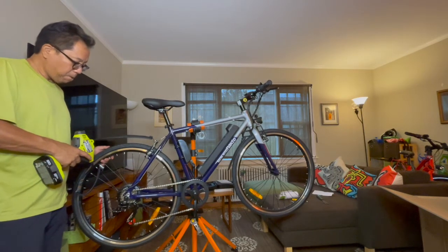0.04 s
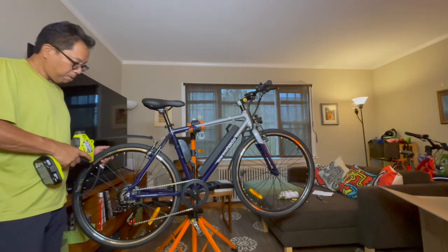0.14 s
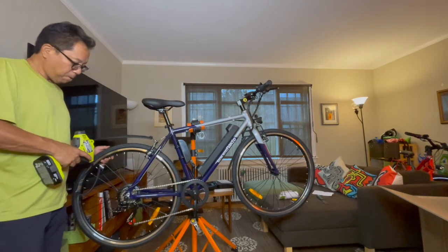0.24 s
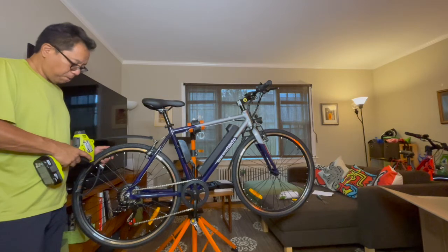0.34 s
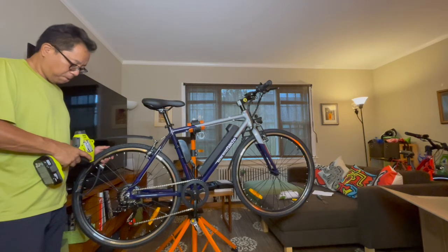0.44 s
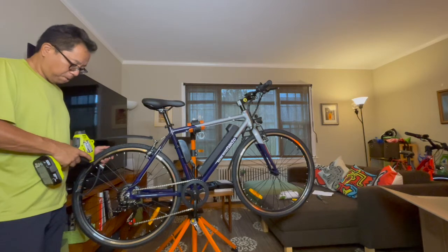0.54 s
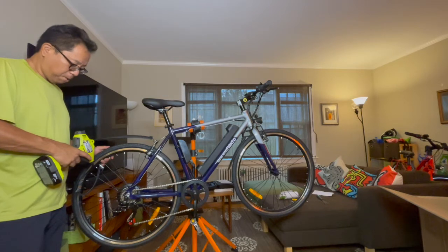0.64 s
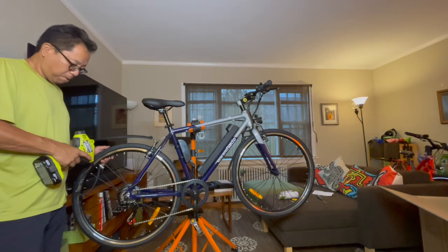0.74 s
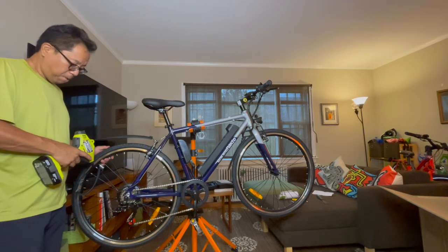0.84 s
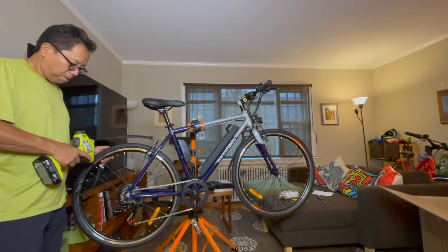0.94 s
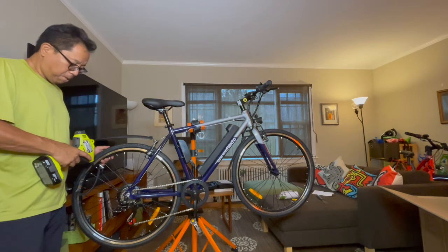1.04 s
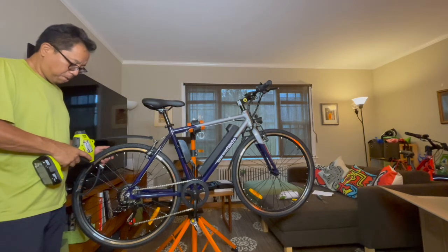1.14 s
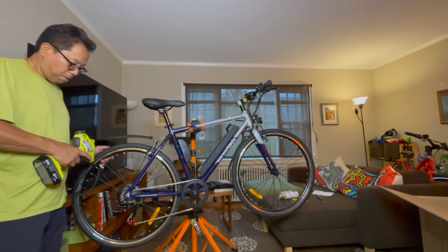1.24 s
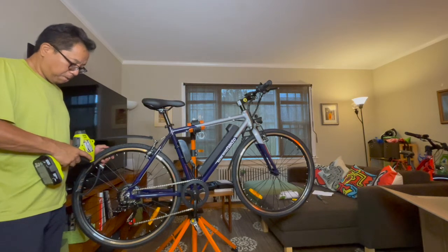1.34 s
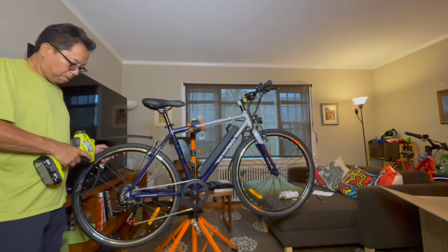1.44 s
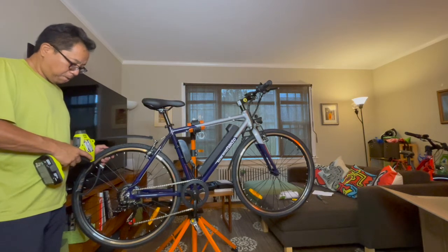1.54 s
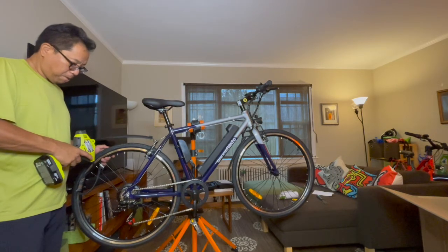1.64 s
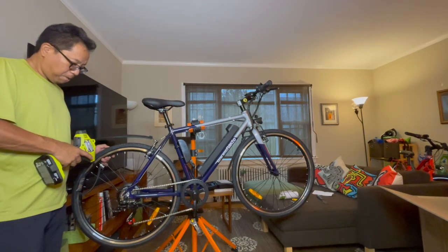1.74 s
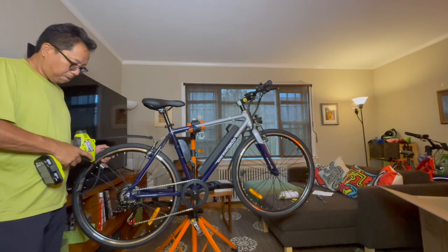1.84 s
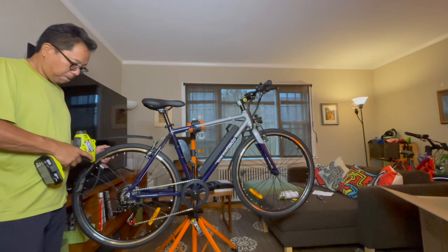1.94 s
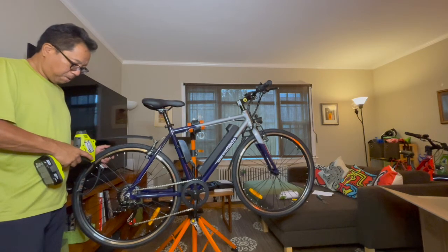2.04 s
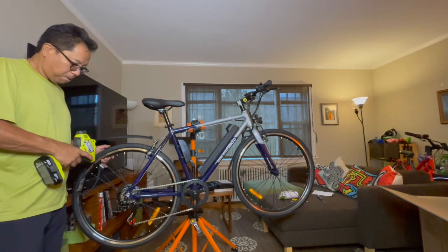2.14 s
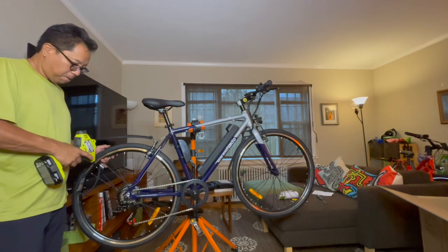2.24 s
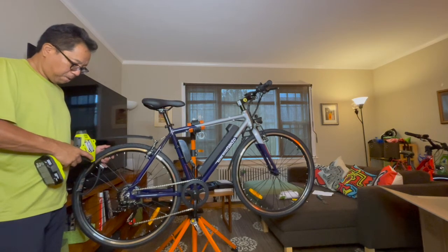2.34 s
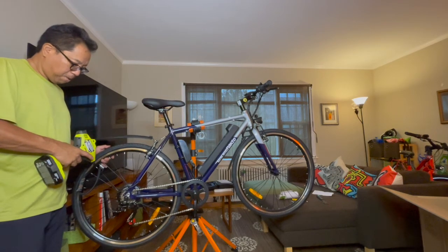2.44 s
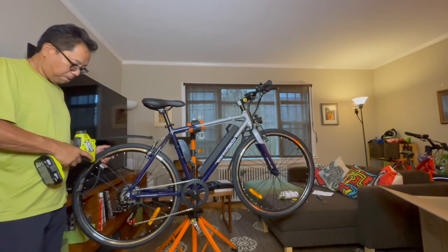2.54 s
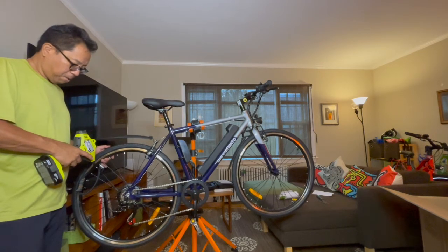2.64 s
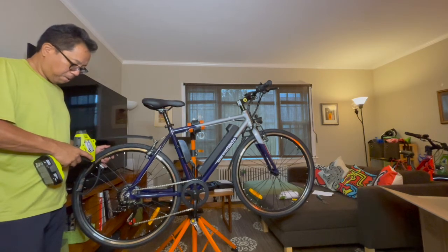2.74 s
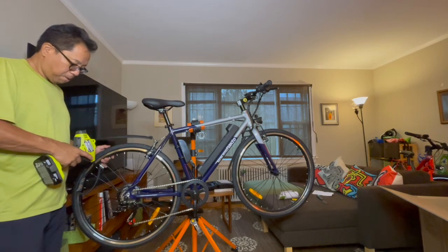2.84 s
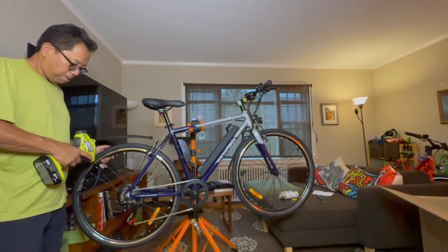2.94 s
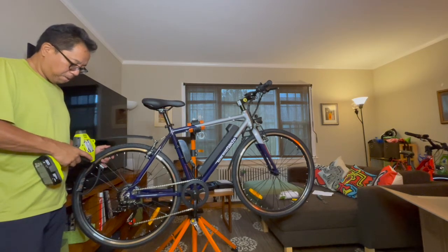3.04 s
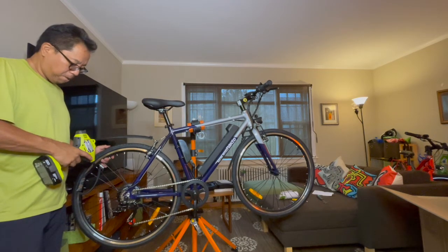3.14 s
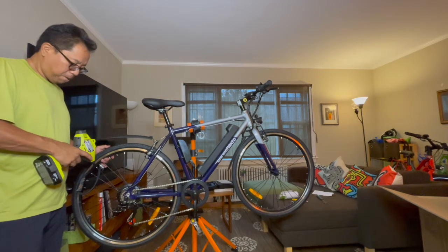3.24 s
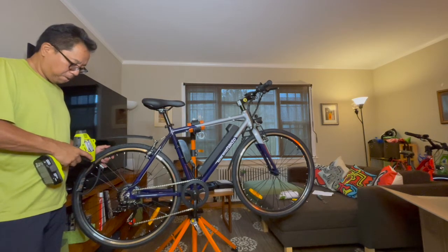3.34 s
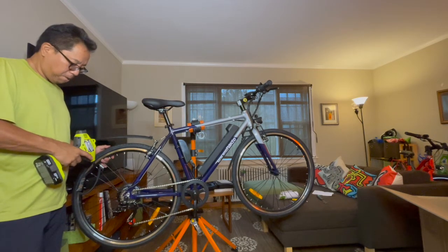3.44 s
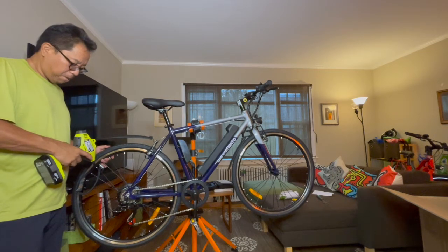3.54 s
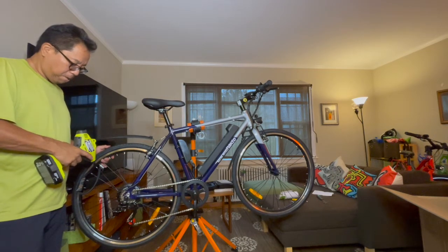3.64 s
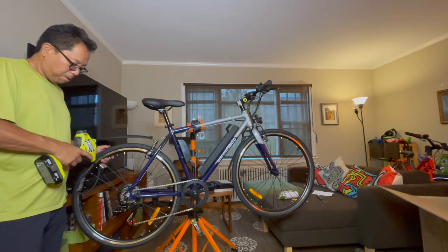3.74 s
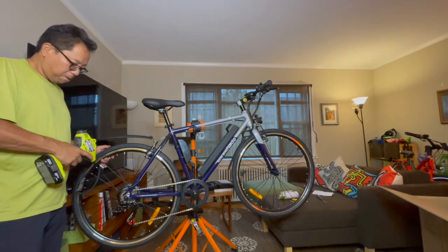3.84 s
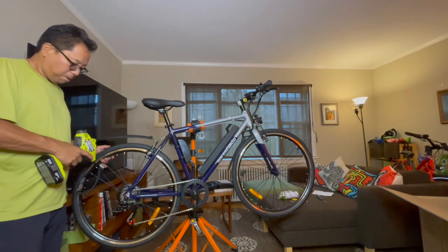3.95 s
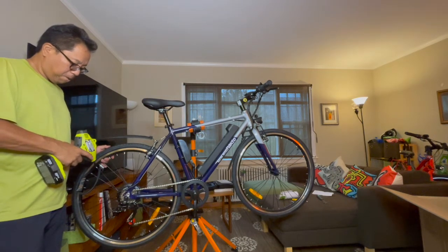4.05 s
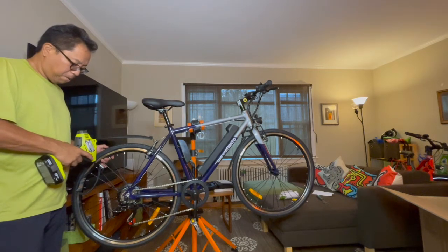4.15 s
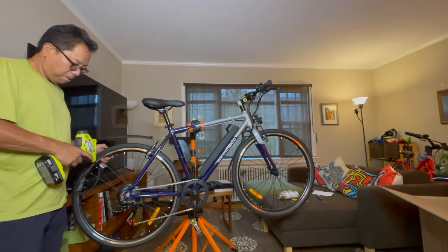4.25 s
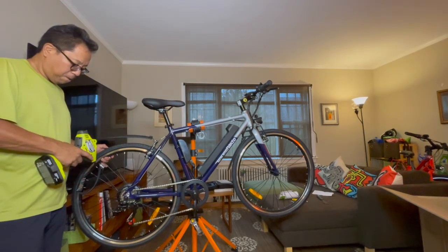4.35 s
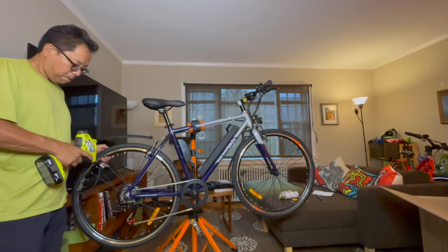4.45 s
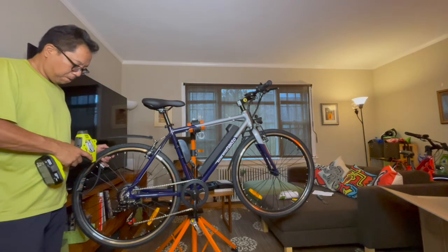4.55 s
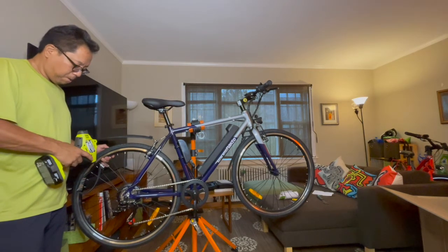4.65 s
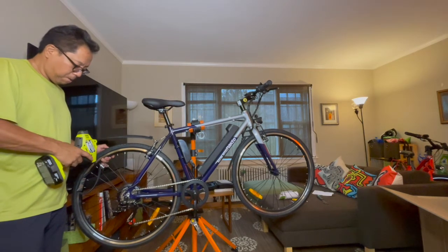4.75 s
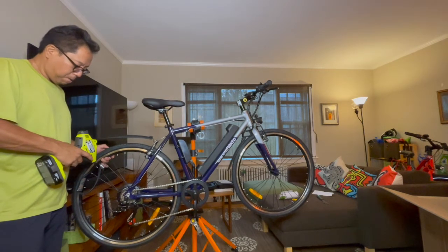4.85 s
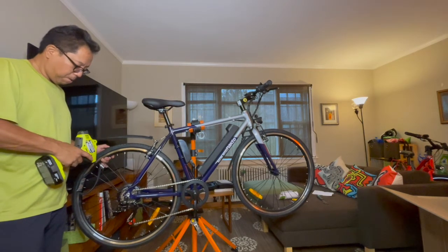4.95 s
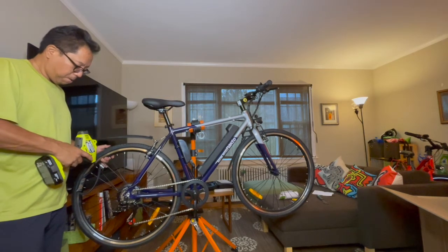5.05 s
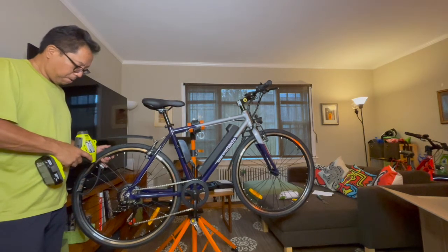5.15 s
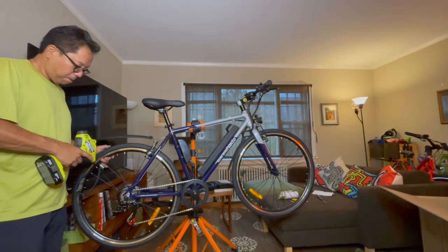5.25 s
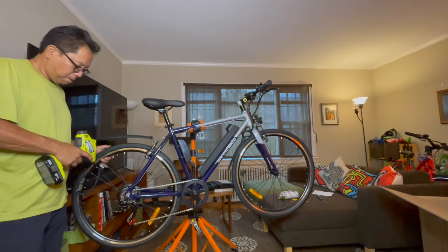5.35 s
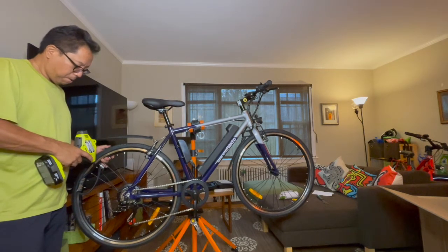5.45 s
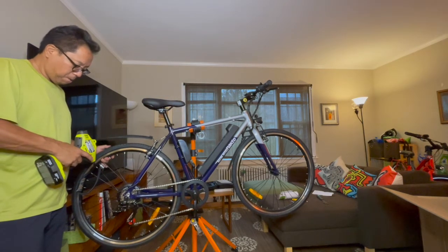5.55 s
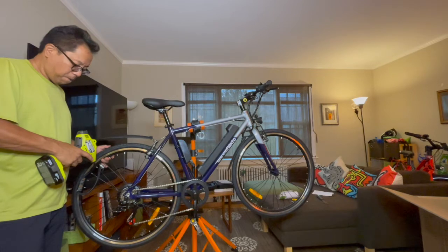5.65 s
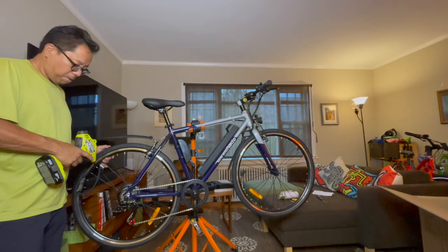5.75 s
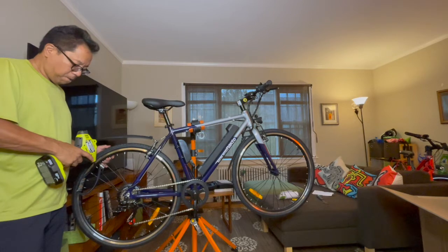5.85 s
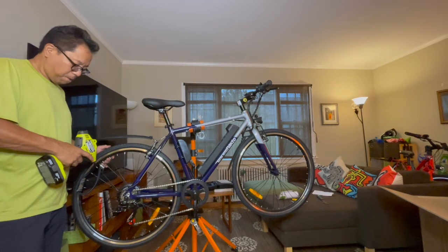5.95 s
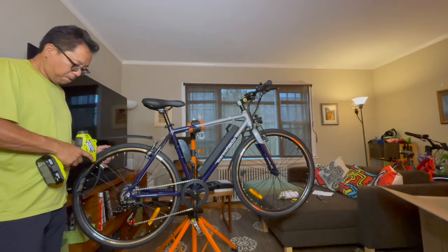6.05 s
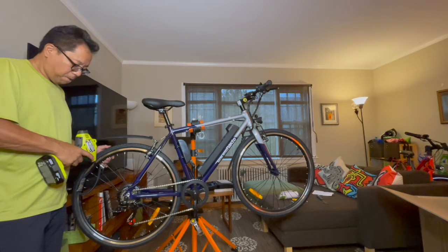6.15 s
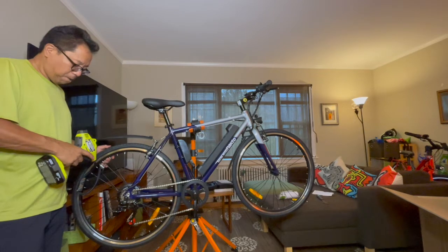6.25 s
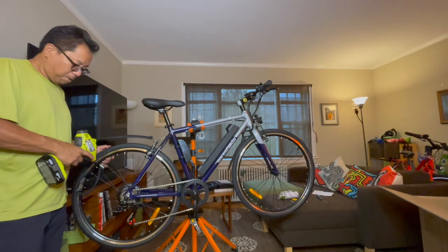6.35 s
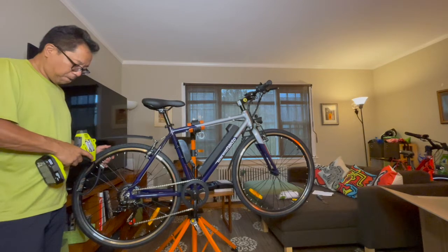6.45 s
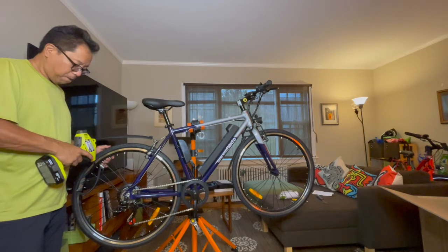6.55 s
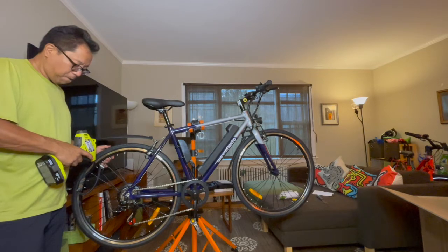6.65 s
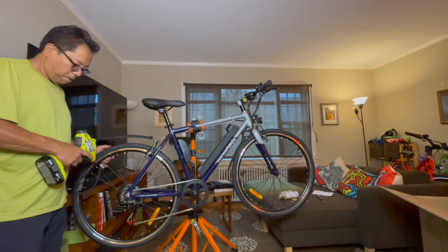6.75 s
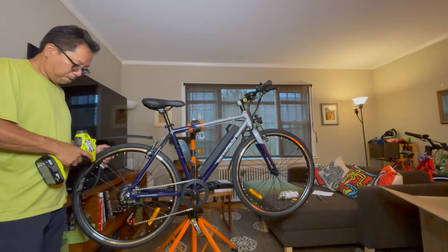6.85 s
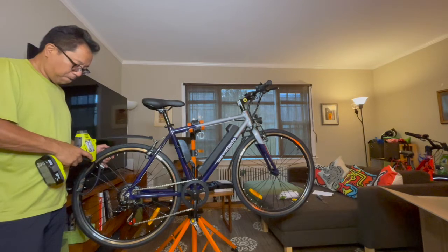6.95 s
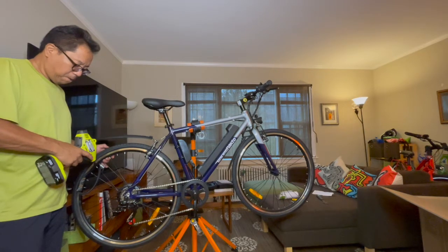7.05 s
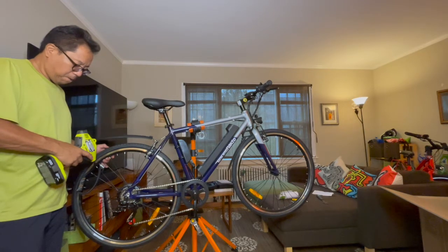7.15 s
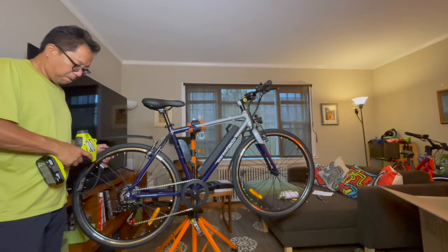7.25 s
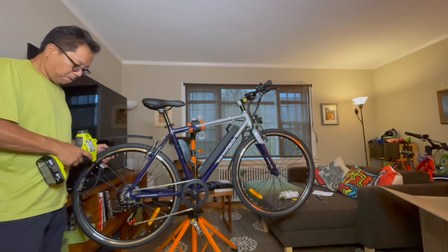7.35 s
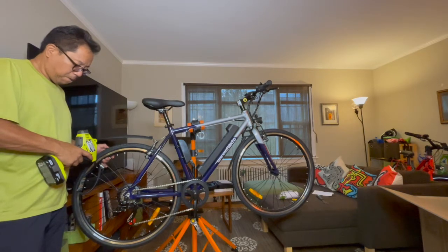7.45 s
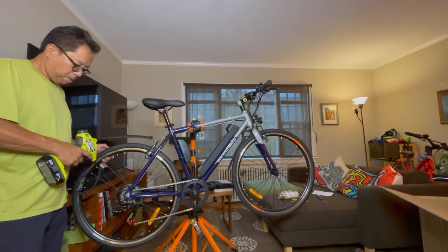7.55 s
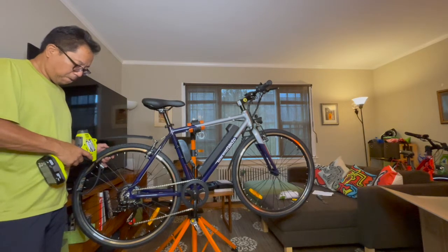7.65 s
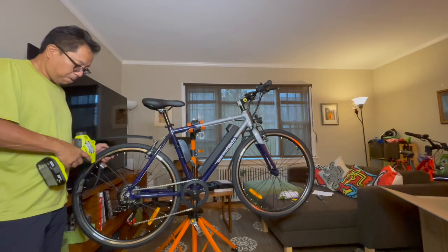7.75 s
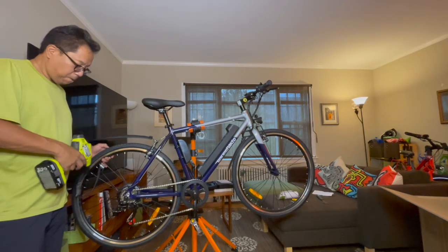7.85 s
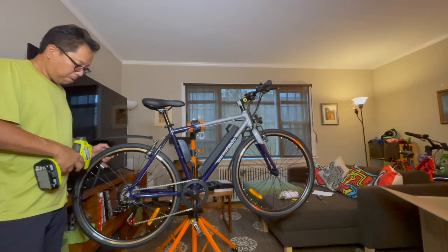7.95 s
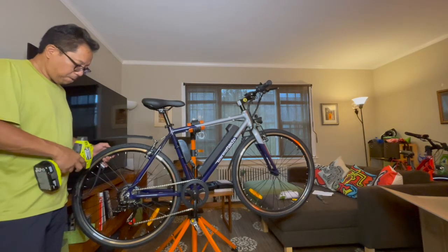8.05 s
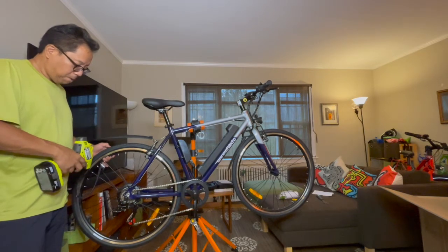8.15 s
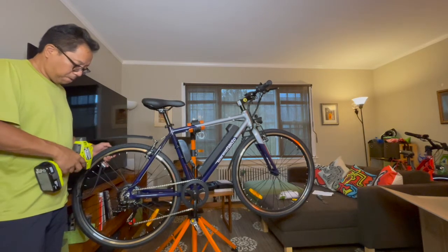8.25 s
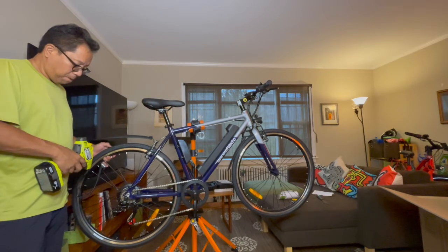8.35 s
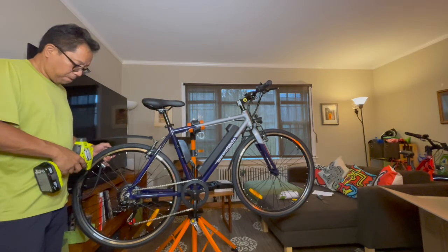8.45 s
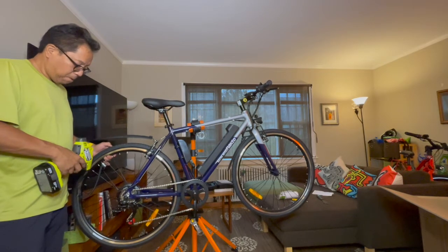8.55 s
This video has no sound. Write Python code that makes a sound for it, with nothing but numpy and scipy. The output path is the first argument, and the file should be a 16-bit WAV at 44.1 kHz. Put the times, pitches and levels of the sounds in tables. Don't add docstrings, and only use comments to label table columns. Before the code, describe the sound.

From 0 s a hand-held cordless inflator is already running at full level, pumping a bicycle tyre in a furnished living room, to the left of a stereo microphone. Its piston beats about fifty times a second, fusing into a coarse, low-to-mid buzzing drone with hard valve clatter, metallic gear whine around 1.5 to 4.5 kHz and a broad air hiss pulsing with every stroke. From 0 to 7.8 s it stays nearly constant, pitch sinking only a few percent as pressure builds, while resonances and housing rattle swell and fade slightly. At about 7.8 s the trigger is released: a knock, then the drone and hiss collapse within about 0.2 to 0.4 s, with a few soft, hollow piston knocks until 7.9 s. Afterwards only a very quiet low building rumble remains, with one barely audible tick near 8.44 s, until the end around 8.6 s.

```python
import sys
import numpy as np
from scipy import signal
from scipy.fft import rfft, irfft, next_fast_len
from scipy.io import wavfile

SR = 44100
rng = np.random.default_rng(int(sys.argv[2]) if len(sys.argv) > 2 else 0)


def digitize_waveform(pressure):
    field = np.atleast_2d(pressure).T
    bounded = np.clip(field, -1, 1)
    quanta = np.round(bounded * 32767).astype(np.int16)
    wavfile.write(sys.argv[1], SR, quanta)


def how_loud(loudness_db):
    steps = np.asarray(loudness_db, float) / 20
    return 10 ** steps


N = 379694
SIZE = next_fast_len(N)
TIME = np.arange(N) / SR
HZ = np.arange(SIZE // 2 + 1) * SR / SIZE + 0.01
COARSE_S = TIME[::512]


def at_time(rows):
    return np.interp(TIME, *np.transpose(rows))


def at_hz(points, hz, column=1):
    points = np.array(points)
    return np.interp(np.log(hz), np.log(points[:, 0]), points[:, column])


def resonance(hz, mode_hz, width_hz, order=2):
    return 1 / (1 + (2 * (hz - mode_hz) / width_hz) ** order)


# [f/Hz, lead/rad]
PORT_LEAD = [(0, 0), (520, 1.6), (1210, 1.8), (1980, 3.1), (3100, 4.8), (4740, 7.5), (6370, 9.8),
             (9130, 15.9), (9600, 15.71), (11000, 15.71), (12100, 18.85), (16500, 18.85)]


def lead(hz):
    return np.interp(hz, *np.transpose(PORT_LEAD))


def drift(rate_hz, size):
    knots = rng.standard_normal((size, int(N / SR * rate_hz) + 2))
    return np.array([np.interp(TIME * rate_hz, np.arange(len(k)), k) for k in knots])


# [f/Hz, left minus right level/dB, likeness/0-1]
PORTS = [(60, -3.5, 1), (250, -4, 0.4), (600, 2.5, 0.5), (1400, 0.5, 0.1), (2490, 2, 0.27), (4300, 4, 0.1),
         (6300, 6.5, 0.32), (7900, 6.5, 0), (9060, 0, 0.2), (9910, 0.5, 0.78), (11030, 5, 0.9),
         (11440, -2, 0.5), (12640, -1, 0.99)]


def stereo_noise(colour_db):
    shared, own = rfft(rng.standard_normal((2, SIZE)))
    alike = np.clip(at_hz(PORTS, HZ, column=2), 0, 1)
    right = alike * shared * np.exp(-1j * lead(HZ)) + np.sqrt(1 - alike ** 2) * own
    return how_loud(colour_db) * np.array([shared, right * how_loud(-at_hz(PORTS, HZ))])


def mid_one(spectra):
    pair = irfft(spectra, SIZE)[:, :N]
    return pair / np.std(pair.mean(axis=0))


def tone(multiple, turns, left, right, phase, ahead):
    angle = 2 * np.pi * multiple * turns + phase
    return np.sqrt(2) * np.array([left * np.cos(angle + ahead / 2), right * np.cos(angle - ahead / 2)])


# [f/Hz, level/dB]
HOUSE = [(22, -42), (36, -12), (50, -2), (68, -19), (100, -15.5), (130, -23.5), (270, -29.5), (460, -33),
         (700, -39), (1400, -52), (2500, -63), (10000, -64), (12500, -80)]


def house():
    return how_loud(-49) * mid_one(stereo_noise(at_hz(HOUSE, HZ)))


# [t/s, speed/(turns/s)]
SPEED = [(0.2, 49.68), (1.18, 49.54), (3.14, 49.07), (5.1, 48.68), (7.55, 48.32)]
MEAN_TURNS_PER_S = 48.89
# [multiple of crank, common level/dB, port difference level/dB]
CRANK = [(2, -74.5, -76), (3, -48, -64.2), (4, -54, -60.8), (5, -48.5, -68.5), (6, -48.5, -57.5),
         (7, -44.5, -45.5), (8, -64, -62), (9, -39.5, -58.5), (10, -59.5, -49), (11, -39, -33),
         (12, -39, -59.5), (13, -50.5, -52.5), (14, -65.5, -49.5), (15, -43, -42.5), (16, -43.8, -42.5),
         (17, -43, -48.5), (18, -44.5, -42.3), (19, -40.5, -39.5), (20, -43.5, -48), (21, -47, -54),
         (22, -49.5, -54.5), (23, -59, -51.5), (24, -55.1, -59), (25, -49, -47.5), (26, -61.5, -50),
         (27, -61.5, -49), (28, -39.5, -37), (29, -47.5, -48.1), (30, -56.5, -52.5)]
# [f/Hz, width/Hz, common level/dB, difference level/dB]
MODES = [(341.6, 3.05, -12.5, -16), (394.3, 12.5, 22.0, 17), (446.7, 4.0, -1, 9.5), (492, 10.4, 23, 9),
         (584.7, 8.2, -30, 10.5), (691, 23.0, 20.5, -7.5), (834.3, 10, -22.0, 5), (883, 16, 4.5, -1),
         (922.6, 37, 5, 6), (1007.5, 35, -23.5, -16), (1071.7, 14.7, 9.5, 14.5), (1170.4, 18.6, 15.5, 18.5),
         (1374.7, 26.7, -15.5, -22.5), (1402.8, 6.7, 4, 9.1),
         (487, 4.2, 4, 0), (634, 6.5, 4, 0), (197.7, 2.6, -2.5, -0.5), (248, 3.0, 2, 3),
         (533.6, 4.5, 3.5, 0.5), (548, 3.2, 3.5, 1.5), (795, 12.0, 3, 0.5), (731, 7.8, 2, 1),
         (940, 16, -3.5, -4.5)]
# [f/Hz, lead/rad]
DIFFERENCE_LEAD = [(250, 2.02), (600, 1.12)]


def crank_phases(multiples):
    housing = 2.5 * np.exp(-((multiples - 7.7) / 1.4) ** 2)
    return_stroke = np.pi / 2 * (multiples % 2) * (multiples > 13)
    scatter_rad = 0.058 * multiples * np.where(multiples < 12.5, 0.5, 1)
    return housing + return_stroke + scatter_rad * rng.standard_normal(len(multiples))


def crank(turns, wobble_db):
    out = 0
    multiples = np.round(np.array(CRANK)[:, 0])
    phases = crank_phases(multiples)
    wobble = how_loud(wobble_db * drift(3.0, size=6))
    speed = np.interp(COARSE_S, *np.transpose(SPEED))
    for k, (_, common_db, difference_db) in enumerate(CRANK):
        hz = multiples[k] * speed
        gain_db = np.array([[common_db], [difference_db]])
        for mode_hz, width_hz, *mode_db in MODES:
            gain_db = gain_db + np.outer(mode_db, resonance(hz, mode_hz, width_hz))
        common, difference = [np.interp(TIME, COARSE_S, how_loud(db)) for db in gain_db]
        angle = 2 * np.pi * multiples[k] * turns + phases[k]
        ahead = at_hz(DIFFERENCE_LEAD, hz.mean())
        mid = common * wobble[k % 6] * np.cos(angle)
        side = difference * wobble[(k + 1) % 6] * np.cos(angle + ahead)
        out = out + np.sqrt(2) * np.array([mid + side, mid - side])
    return out


# [f/Hz, level/dB]
CONTACTS = [(1500, -49), (1900, -52), (2450, -52), (3000, -57), (3800, -58), (4300, -49), (4900, -52),
            (5400, -55.5), (6200, -56.5), (7200, -62.5), (8000, -70), (9500, -74)]
VALVE_TURN, VALVE_DEPTH = 0.62, 0.18


def contacts(turns):
    size, count = 4096, 7
    hz = np.arange(size // 2 + 1) * MEAN_TURNS_PER_S + 0.01
    level = how_loud(at_hz(CONTACTS, hz)) * (hz > 1490) * (hz < 9500)
    shared, own = rng.standard_normal((2, count, len(hz), 2)) @ [1, 1j]
    right = (0.39 * shared * np.exp(-1j * lead(hz)) + 0.99 * own) * how_loud(-at_hz(PORTS, hz))
    patterns = irfft(level * np.array([shared, right]), size) * size / 2
    patterns = patterns * (1 + VALVE_DEPTH * np.cos(2 * np.pi * (np.arange(size) / size - VALVE_TURN)))
    place = (turns % 1 * size).astype(int)
    stage = TIME / TIME[-1] * (count - 1.001)
    k = stage.astype(int)
    blend = stage % 1 * np.pi / 2
    return patterns[:, k, place] * np.cos(blend) + patterns[:, k + 1, place] * np.sin(blend)


# [f/Hz, width/Hz, level/dB]
GEARS = [(1553, 14, -47), (1625, 14, -55.5), (1803, 16, -44.5), (1980, 16, -46), (2440, 23, -56),
         (2425, 28, -37), (2522, 18, -45), (2616, 11, -40.5), (4145, 30, -49), (4279, 46, -46),
         (4317, 31, -45.5), (4397, 24, -50), (4480, 17, -47), (4930, 30, -52.5)]


def gears(turns, wobble_db):
    out = 0
    wobble = how_loud(wobble_db * drift(4.0, size=5))
    speed = np.interp(COARSE_S, *np.transpose(SPEED))
    for k, (hz, width_hz, db) in enumerate(GEARS):
        side = how_loud(at_hz(PORTS, hz) / 2)
        lowest, highest = round(hz / speed.max()), round(hz / speed.min())
        for multiple in range(lowest, highest + 1):
            passing = how_loud(db) * resonance(multiple * speed, hz, width_hz)
            level = np.interp(TIME, COARSE_S, passing) * wobble[k % 5]
            phase = 0.5 * np.sin(k * multiple)
            out = out + tone(multiple, turns - VALVE_TURN, level * side, level / side, phase, lead(hz))
    return out


# [multiple of crank, level/dB]
MOTOR = [(3.62, -61), (10.41, -60), (18.41, -50), (23.59, -53), (30.22, -52.5), (31.22, -51.5),
         (32.19, -50), (33.19, -55.5), (34.19, -65.5)]


def motor(turns, wobble_db):
    out = 0
    wobble = how_loud(wobble_db * drift(5.3, size=len(MOTOR)))
    wander_rad = 0.56 * drift(4.0, size=len(MOTOR))
    for (multiple, db), level, phase in zip(MOTOR, wobble, wander_rad):
        ahead = lead(multiple * MEAN_TURNS_PER_S)
        out = out + tone(multiple, turns, how_loud(db) * level, how_loud(db - 16.5) * level, phase, ahead)
    return out


# [f/Hz, density/(dB per Hz)]
AIR = [(120, -16.5), (300, -10), (500, 3), (650, 0.5), (880, 2.5), (1250, 2), (1600, 2.5), (2000, -4.5),
       (3000, 0), (3900, -3), (6200, -1.5), (9000, -9.5), (12000, -13), (15000, -10.5)]
# [f/Hz, width/Hz, level/dB]
HOUSING = [(518, 80, 4), (2410, 140, 3), (4270, 110, 3), (5080, 260, 3), (5555, 380, -18), (7480, 560, -13),
           (7950, 200, 3.5), (14300, 86, 8.5)]
SPLITS_HZ = [1200, 6000]
# [t/s, level/dB]
GRIP = [(0.0, -43.5), (0.75, -40), (1.86, -44), (3.26, -46), (4.4, -42), (5.6, -42.5), (6.07, -48),
        (6.8, -49), (7.7, -44.5)]
# [level at release/dB, t60/s]
COASTING = [(-28.5, .44), (-29, 0.41), (-51, 0.21)]
BREATH = [(0.17, 0.15), (0.073, 0.07), (0.13, 0.08)]


def air(turns, after_s):
    colour_db = at_hz(AIR, HZ)
    for hz, width_hz, db in HOUSING:
        colour_db = colour_db + db * resonance(HZ, hz, width_hz, order=4)
    spectra = stereo_noise(colour_db) * (HZ > 90) * (HZ < 15800)
    low, mid = [1 / (1 + (HZ / hz) ** 6) for hz in SPLITS_HZ]
    bands = [low, mid - low, 1 - mid]
    pumping = [at_time(GRIP), -37.5, -38.5]
    running = np.exp(-after_s / 0.039)
    out = 0
    for band, pumping_db, (coast_db, t60_s), (once, twice) in zip(bands, pumping, COASTING, BREATH):
        breath = 1 + once * np.cos(2 * np.pi * (turns - 0.65)) + twice * np.cos(4 * np.pi * (turns - 0.3))
        coasting = how_loud(coast_db - 60 * after_s / t60_s)
        level = how_loud(pumping_db) * running + coasting * (1 - running)
        out = out + mid_one(spectra * np.sqrt(band)) * level * breath
    return out


# [t/s, level/dB]
LAST_STROKES = [
    (7.805, -24),
    (7.845, -36),
    (7.877, -31),
    (7.912, -30),
    (8.443, -68),
]
# [f/Hz, level/dB, t60/s]
CYLINDER = [(1430, -3, 0.1), (1520, -9, 0.073), (1010, -4, 0.067), (483, -8, .1), (173, -12.5, 0.12),
            (2150, 2, 0.053)]


def last_strokes():
    out = np.zeros(N)
    for s, db in LAST_STROKES:
        age_s = np.maximum(TIME - s, 0)
        onset = 1 - np.exp(-age_s / 0.0017)
        for hz, mode_db, t60_s in CYLINDER:
            out += how_loud(db + mode_db - 60 * age_s / t60_s) * onset * np.sin(2 * np.pi * hz * age_s)
    return np.array([out, 0.6 * np.roll(out, 8)])


def scene():
    release_s, ring_t60_s, brake_s = 7.797, 0.18, 0.153
    after_s = np.maximum(TIME - release_s, 0)
    speed = at_time(SPEED)
    turns = np.cumsum(speed) / SR
    slowing_turns = np.cumsum(speed * np.exp(-after_s / brake_s)) / SR
    lines = crank(turns, wobble_db=1.3) + contacts(turns)
    lines = lines + gears(turns, wobble_db=1.0) + motor(turns, wobble_db=1.2)
    ringing = how_loud(-60 * after_s / ring_t60_s)
    return house() + lines * ringing + air(slowing_turns, after_s) + last_strokes()


def top_cut(x):
    return signal.sosfilt(signal.butter(12, 16980, fs=SR, output="sos"), x)


def record(dry):
    low_pass = signal.cheby2(20, 60, 16100, fs=SR, output="sos")
    mix = signal.sosfilt(low_pass, dry)
    return top_cut(mix)


dry = scene()
out = record(dry)
digitize_waveform(out)
```